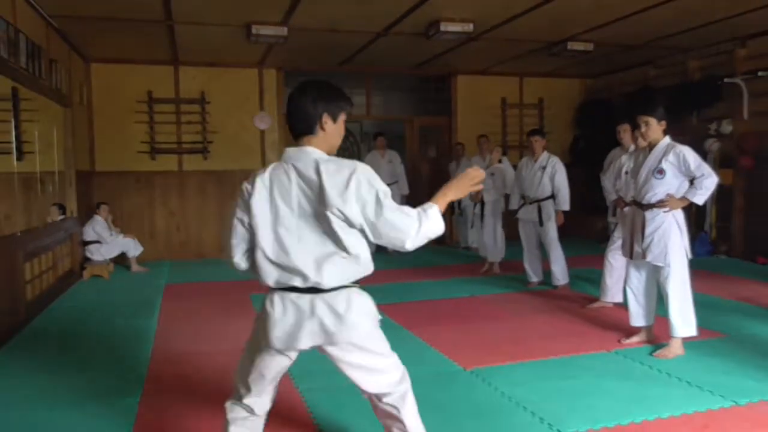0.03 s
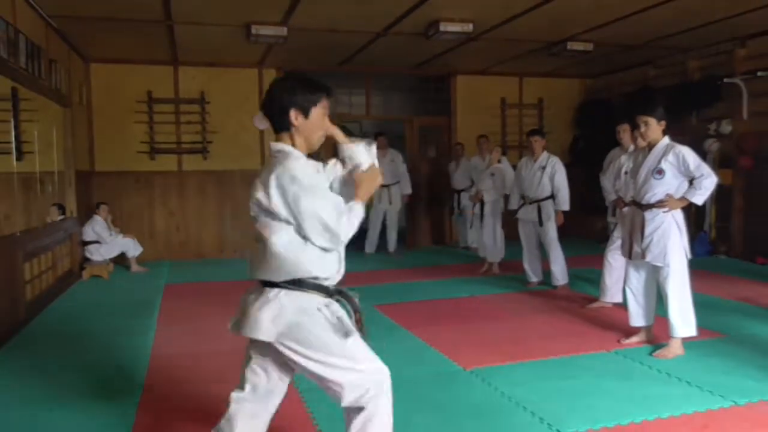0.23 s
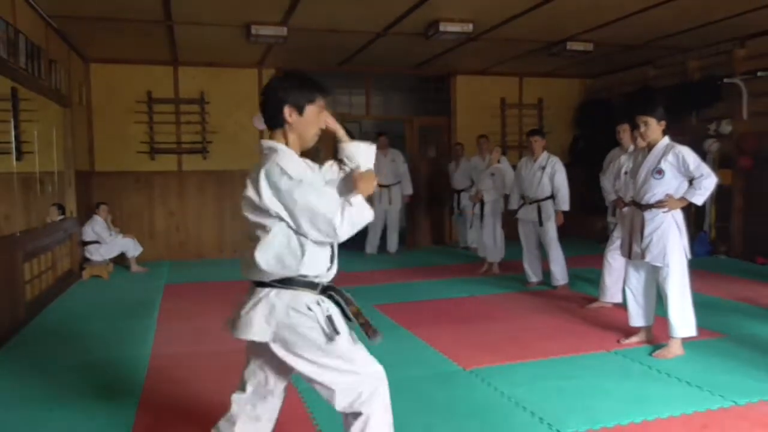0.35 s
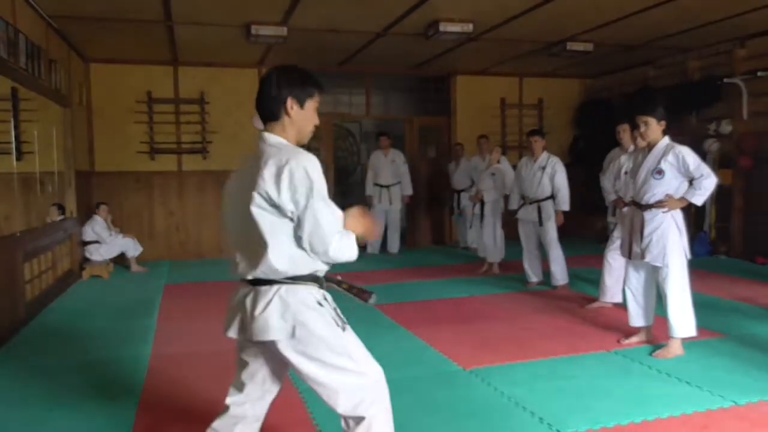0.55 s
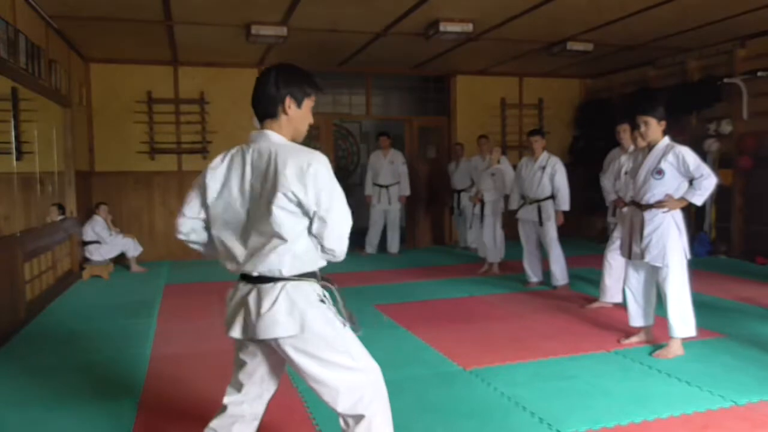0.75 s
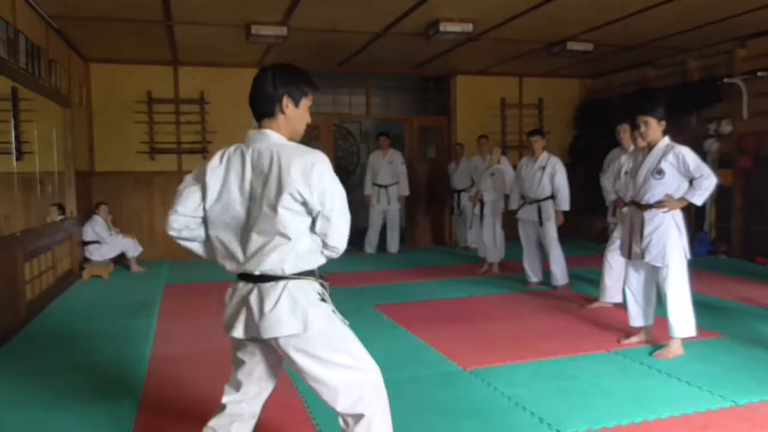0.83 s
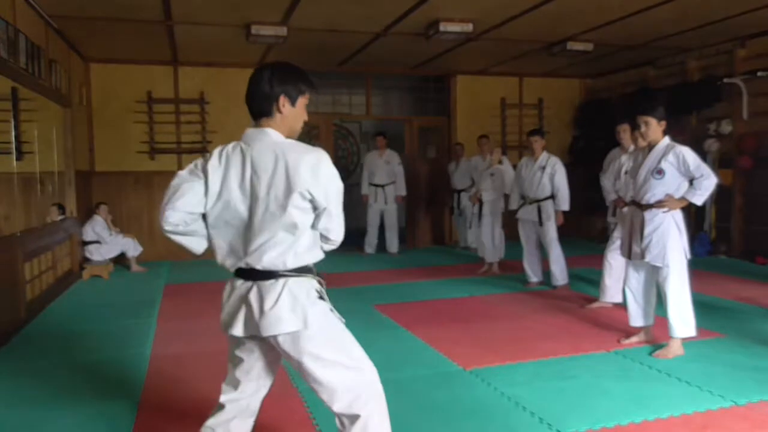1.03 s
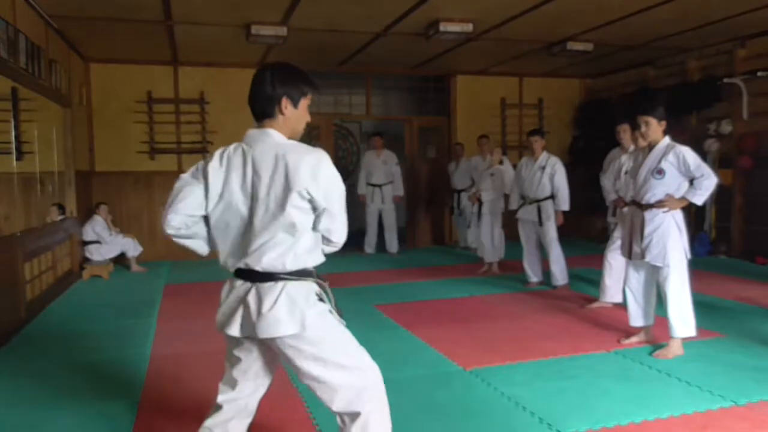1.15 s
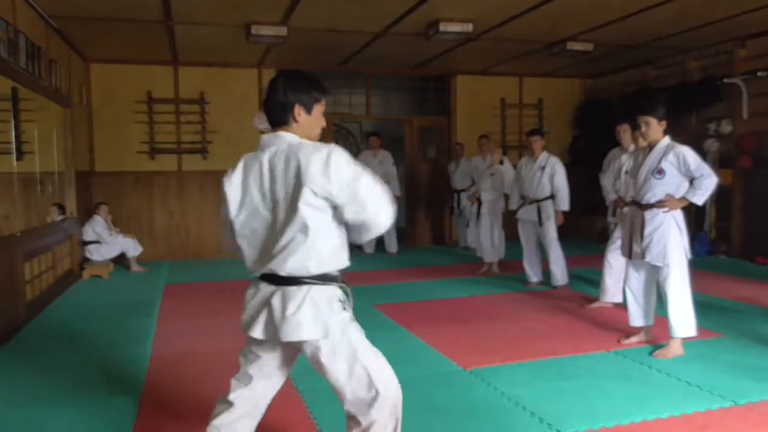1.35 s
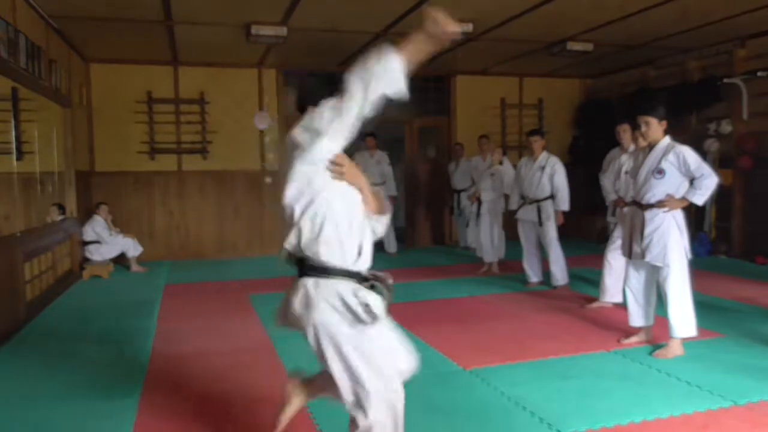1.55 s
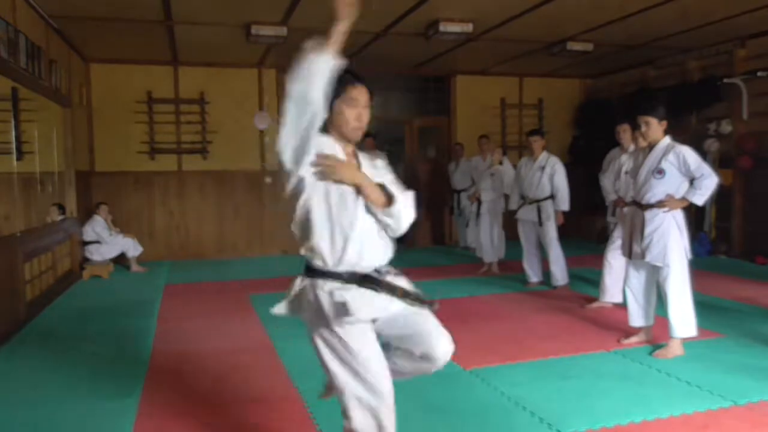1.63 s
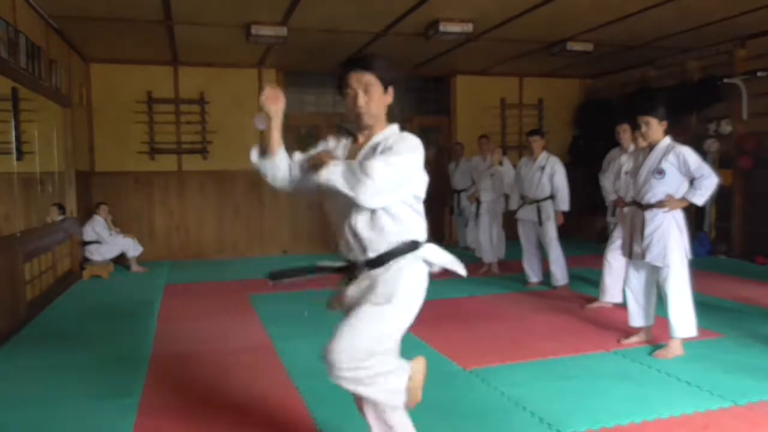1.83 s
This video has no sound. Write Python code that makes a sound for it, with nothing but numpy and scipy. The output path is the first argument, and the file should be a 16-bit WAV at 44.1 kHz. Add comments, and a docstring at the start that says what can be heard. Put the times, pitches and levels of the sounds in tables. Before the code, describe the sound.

A heavy cotton martial arts sleeve snaps taut like a whip crack, then a jacket flaps duller

```python
"""Punches in a heavy cotton suit

Punches are thrown in a reverberant hall. A sleeve jerks taut on the first: noise cracks and air pops.
Soft distant thumps follow, then the loose jacket flaps on the second: damped rings and filtered slaps.
Cloth rubs and billows as filtered random clicks; feet on mats, a deep rumble and the hall's low hum
are filtered noise. Cracks, thumps, flaps and cloth excite a synthetic decaying hall response."""
import sys
import numpy as np
from scipy import signal
from scipy.io import wavfile
from scipy.ndimage import uniform_filter1d

SR = 44100
rng = np.random.default_rng(int(sys.argv[2]) if len(sys.argv) > 2 else 0)


def to_wav(sig):
    """Store sig (one row per channel, or 1-D mono) as 16-bit WAV at the path in sys.argv[1].

    Samples outside -1..1 are clipped; the rate is SR.
    """
    pcm = np.clip(np.atleast_2d(sig), -1, 1) * 32767
    pcm = np.round(pcm).astype(np.int16)
    wavfile.write(sys.argv[1], SR, pcm.T)  # frames by channels


N = 83790
T = np.arange(N) / SR


def amp(db):
    """Logarithmic level: decibels become an amplitude factor."""
    return 10 ** (np.asarray(db) / 20)


def unit(x):
    """Normalization: the signal is scaled to an rms of one."""
    return x / np.sqrt(np.mean(x ** 2) + 1e-20)


def read(points, hz):
    """Logarithmic frequency axis: a table is interpolated along it."""
    f, value = np.transpose(points)
    return np.interp(np.log(hz + 1), np.log(f + 1), value)


def add(mix, s, sound):
    """Superposition: a sound is added to the mix at a time in seconds."""
    part = mix[round(s * SR):][:len(sound)]
    part += sound[:len(part)]


def colour(x, points, size=4096):
    """Minimum-phase filtering: a causal response of unit energy takes the shape of a spectrum."""
    hz = abs(np.fft.fftfreq(size, 1 / SR))
    log_gain = np.log(amp(read(points, hz)))
    # the Hilbert transform of the log gain supplies the minimum phase
    spectrum = np.exp(np.conj(signal.hilbert(log_gain)))
    taps = np.fft.ifft(spectrum).real[:size // 2]
    taps = taps / np.linalg.norm(taps)
    return np.apply_along_axis(lambda v: signal.fftconvolve(v, taps)[:N], -1, x)


def pair(a, b, same):
    """Interchannel correlation: two unrelated signals become left and right of a given likeness."""
    same = np.clip(same, -1, 1)
    mid = a * np.sqrt((1 + same) / 2)
    side = b * np.sqrt((1 - same) / 2)
    return np.array([mid + side, mid - side])


def grains(per_s, spread_db, same):
    """Shot noise: a stereo train of random clicks of uneven size and random sign."""
    size = amp(spread_db * np.minimum(rng.exponential(1, (2, N)), 5))
    sign = rng.choice([-1, 1], (2, N))
    present = rng.random((2, N)) < per_s / SR
    return unit(pair(*(size * sign * present), same))


def swells(rows):
    """Power summation: overlapping bell-shaped movements add in energy, not amplitude."""
    power = 0
    for s, rise, fall, db in rows:
        width = np.where(T < s, rise, fall)
        power = power + amp(db) ** 2 * np.exp(-((T - s) / width) ** 2 * 2)
    return np.sqrt(power)


# folds jerking taut: (time [s], crack level [dB], air pop level [dB], pop pitch [Hz])
FOLD_SNAPS = [(.2767, -6, 0, 1000), (.2782, -5, -2, 1200), (.2789, 15, 13, 1120), (.2801, .5, -1, 1250),
              (.2815, 5, 1.5, 1000), (.2842, 6.5, 4.5, 1100), (.2854, -4, 3.5, 520), (.2878, -4, -2, 1100),
              (.2901, 2, -8, 1100), (.2925, -3, -9, 1100)]
# spectrum of the fibre crack: (frequency [Hz], relative level [dB])
CRACK_SPECTRUM = [(1200, -22.5), (2100, -9), (2500, -12), (3000, -8), (3900, -10), (4650, -4.5),
                  (5400, -13.5), (6300, -13), (7300, -5.5), (9000, -3.5), (12000, 0.5), (14000, -10),
                  (16000, -19)]
# spectrum of the air pop: (multiple of its pitch [ratio], relative level [dB])
POP_SPECTRUM = [(.04, -50), (.09, -23), (.16, -6), (.27, -14), (.42, -7.5), (.55, -11), (.73, -.5),
                (1.05, -.5), (1.25, -1.5), (1.5, -18), (2, -18), (3, -22), (7.5, -52)]
CRACK_RISE_S, CRACK_FALL_S = .00019, .0002
FRAY_S, FRAY_DB = .0016, -21  # weaker, slower tail of the crack
CRACK_PAN_DB, POP_PAN_DB = -.6, .7  # left gain; the right is opposite
SNAP_WET_DB = -1


def sleeve():
    """Impulsive radiation: each taut fold gives a noise crack and an air pop, with its own hall tail."""
    out = np.zeros((2, N))
    t = T[:SR // 50] - T[SR // 500]  # begins 2 ms before the peak
    side = np.array([[1], [-1]])
    onset = np.exp(-abs(t) / CRACK_RISE_S)
    decay = np.exp(-abs(t) / CRACK_FALL_S) + amp(FRAY_DB) * np.exp(-abs(t) / FRAY_S)
    shape = np.where(t < 0, onset, decay)
    for s, crack_db, pop_db, pop_hz in FOLD_SNAPS:
        crack, pop = np.zeros(N), np.zeros(N)
        add(crack, s + t[0], shape * rng.choice([-1, 1], len(t)))
        crack = colour(crack, CRACK_SPECTRUM)
        crack = amp(crack_db) * crack / np.linalg.norm(crack)
        add(pop, s, amp([pop_db]))
        pop = colour(pop, [(k * pop_hz, db) for k, db in POP_SPECTRUM])
        direct = amp(side * CRACK_PAN_DB) * crack + amp(side * POP_PAN_DB) * pop
        out += direct + amp(SNAP_WET_DB) * hall((crack + pop)[None])
    return out


# soft distant thumps, perhaps steps across the hall, then jacket panels slapping the body on the punch:
# (time [s], ring level [dB], slap level [dB], ring pitch [Hz])
THUMPS_AND_FLAPS = [(1.046, -29, -35, 860), (1.058, -28, -34, 940), (1.073, -39, -55, 775),
                    (1.238, -26.5, -26, 343), (1.254, -27, -42, 1310), (1.5735, -1.5, -36, 638),
                    (1.578, -12, -12, 574), (1.5829, 1, 1.5, 578), (1.5877, -1, -6, 555),
                    (1.591, -10, -10, 1182), (1.5948, -16, -6, 970), (1.5976, -0.5, -3, 373),
                    (1.6028, -9, -9, 420), (1.6063, -14, -5, 1005), (1.6126, -7.5, -8, 788),
                    (1.645, -13, -21, 1066), (1.662, -14, -13, 774)]
# spectrum of the thump or slap: (frequency [Hz], relative level [dB])
SLAP_SPECTRUM = [(40, -35), (80, -7), (135, 11.5), (200, 0.5), (280, 2.5), (420, -3.5), (800, -5),
                 (1100, -2), (1350, -9), (1700, -22), (3000, -32), (6000, -58), (16000, -75)]
RING_S = 0.004  # time constant of the ring
FLAP_WET_DB = -3.5


def thumps_and_jacket():
    """Damped resonance: each thump or flap is a briefly decaying sine and a slap, direct and in the hall."""
    out = np.zeros((2, N))
    t = T[:SR // 20]
    slap = colour(signal.unit_impulse(len(t)), SLAP_SPECTRUM)[:len(t)]
    for s, ring_db, slap_db, hz in THUMPS_AND_FLAPS:
        soft_onset = 1 - np.exp(-(hz * t) ** 2 * 2)
        ring = np.sin(2 * np.pi * hz * t) * np.exp(-t / RING_S) * soft_onset
        ring = ring / np.linalg.norm(ring)
        hit = np.zeros(N)
        add(hit, s, amp(ring_db) * ring + amp(slap_db) * slap)
        out += hit + amp(FLAP_WET_DB) * hall(hit[None])
    return out


# cloth sliding on cloth: (peak time [s], rise [s], fall [s], hiss level [dB], scrape level [dB])
CLOTH_RUBS = [(0.067, 0.023, 0.036, -49.5, -54.5), (0.144, 0.04, 0.12, -47, -47),
              (0.238, 0.031, 0.17, -34, -47), (.445, 0.044, 0.025, -59, -41.5),
              (.62, 0.031, 0.039, -54.5, -59), (.77, 0.15, 0.057, -60, -61), (.95, 0.17, 0.2, -59.5, -61),
              (1.219, 0.045, 0.015, -56.5, -59.5), (1.278, 0.038, 0.029, -49.5, -55.5),
              (1.365, 0.066, 0.072, -46.5, -50.5), (1.5, 0.048, 0.078, -51.5, -51),
              (1.548, 0.018, 0.02, -42.5, -47), (1.584, 0.01, 0.029, -41, -39.5),
              (1.63, 0.047, 0.056, -51, -48.5), (1.797, 0.045, 0.048, -39.5, -46),
              (1.849, 0.039, 0.073, -38, -44.5)]
# spectrum of the fine hiss: (frequency [Hz], relative level [dB])
HISS_SPECTRUM = [(3000, -26.5), (6200, -13.5), (7300, -3), (8500, -5.5), (10000, -8.5), (12000, -9.5),
                 (14000, -15.5), (15500, -25), (16500, -45)]
# spectrum of the coarser scrape: (frequency [Hz], relative level [dB])
SCRAPE_SPECTRUM = [(200, -29), (500, -7.5), (900, -7.5), (1350, 3.5), (1700, 0.5), (2300, 0.5),
                   (3000, -1.5), (3800, 2.5), (4800, .5), (5800, -9.5), (9000, -38)]
FIBRES_PER_S, FIBRE_SPREAD_DB = 9000, 1


def rubbing():
    """Stick-slip friction: random fibre clicks form a fine hiss and a coarser scrape."""
    hiss_level = swells([(s, rise, fall, db) for s, rise, fall, db, _ in CLOTH_RUBS])
    scrape_level = swells([(s, rise, fall, db) for s, rise, fall, _, db in CLOTH_RUBS])
    hiss = grains(FIBRES_PER_S, FIBRE_SPREAD_DB, same=0.23) * hiss_level
    scrape = grains(FIBRES_PER_S, FIBRE_SPREAD_DB, same=0.53) * scrape_level
    return colour(hiss, HISS_SPECTRUM) + colour(scrape, SCRAPE_SPECTRUM)


# loose cloth pushing air: (peak time [s], rise [s], fall [s], level [dB])
CLOTH_BILLOWS = [(.148, 0.037, 0.045, -44.5), (.18, 0.014, 0.023, -37), (.245, 0.018, 0.027, -38),
                 (.68, 0.049, 0.025, -48), (.85, 0.22, 0.09, -60.5), (1.058, 0.018, 0.018, -47.5),
                 (1.29, 0.061, 0.1, -57), (1.465, 0.087, 0.016, -46), (1.497, 0.023, 0.043, -37),
                 (1.545, 0.021, 0.2, -43.5), (1.85, 0.006, 0.033, -51.5)]
# spectrum of the billowing: (frequency [Hz], relative level [dB])
BILLOW_SPECTRUM = [(50, -37), (150, -4.5), (260, -7.5), (380, 1), (560, -0.5), (800, -5.5), (1300, -13),
                   (1800, -25.5), (5000, -40.5)]
FOLDS_PER_S, FOLD_SPREAD_DB = 1500, 2


def billowing():
    """Air displacement: tumbling soft folds push air in sparse random clicks, filtered low."""
    folds = grains(FOLDS_PER_S, FOLD_SPREAD_DB, same=0.92)
    return colour(folds * swells(CLOTH_BILLOWS), BILLOW_SPECTRUM)


# weight shifting on the mats: (peak time [s], rise [s], fall [s], level [dB])
FOOT_STEPS = [(.005, .02, 0.059, -50), (.41, 0.15, 0.1, -46.5), (.575, 0.032, 0.12, -51.5),
              (1.645, 0.024, 0.16, -44.5), (1.78, 0.011, 0.081, -58)]
# spectrum of the mats: (frequency [Hz], relative level [dB])
MAT_SPECTRUM = [(30, -66), (80, -29), (100, -1.5), (140, 4), (185, -1), (260, -10), (800, -33.5)]


def feet():
    """Low-frequency impact response: shifting weight gives dull noise thuds, alike in both channels."""
    noise = pair(*rng.standard_normal((2, N)), same=1.0)
    return colour(noise * swells(FOOT_STEPS), MAT_SPECTRUM)


# a deep rumble coming and going: (peak time [s], rise [s], fall [s], level [dB])
RUMBLE_SWELLS = [(.01, 0.066, 0.029, -49), (.16, 0.069, 0.12, -59), (.52, 0.14, 0.17, -68),
                 (1.84, 0.013, 0.049, -69)]
# spectrum of the rumble: (frequency [Hz], relative level [dB])
RUMBLE_SPECTRUM = [(20, -18), (50, 7), (75, -1), (130, -7), (400, -29)]


def rumble():
    """Modulated low-frequency noise: a deep rumble swells, nearly the same in both channels."""
    noise = pair(*rng.standard_normal((2, N)), same=0.95)
    return colour(noise * swells(RUMBLE_SWELLS), RUMBLE_SPECTRUM)


# spectrum of the hall's background: (frequency [Hz], relative level [dB])
HUM_SPECTRUM = [(20, -11), (55, -3.5), (90, -8.5), (130, -2.5), (200, -3), (280, -7.5), (480, -3),
                (800, -5), (1000, -9.5), (1350, -8), (1800, -24), (5000, -31), (6200, -36), (8000, -48),
                (11000, -19.5), (13000, -28.5), (16000, -44)]
HUM_DB = -53.3


def hum():
    """Stationary noise: the hall's background keeps a constant level and spectrum."""
    noise = pair(*rng.standard_normal((2, N)), same=0.55)
    return amp(HUM_DB) * colour(noise, HUM_SPECTRUM)


# reverberation time, for a 60 dB decay: (frequency [Hz], time [s])
REVERB_TIME = [(100, 0.53), (400, 0.46), (1000, 0.6), (2500, 0.5), (5000, 0.57), (8000, 0.52),
               (14000, 0.34)]
# level of the reverberation: (frequency [Hz], level [dB])
REVERB_GAIN = [(100, -14), (200, -2), (450, -6.5), (850, 3.5), (1400, -2.5), (2200, 1), (3200, -5),
               (5000, -1), (8000, -8), (12000, -6.5), (14000, -13), (16000, -26)]
# likeness of left and right in the reverberation: (frequency [Hz], correlation [ratio])
REVERB_SAME = [(60, 0.96), (150, 0.82), (380, 0.79), (950, 0.57), (2400, 0.7), (6000, 0.22), (15000, 0.033)]
HALL_BUILD_S = 0.011


def hall(x):
    """Diffuse-field decay: a noise tail builds up briefly, then each band decays at its own rate."""
    hz, t, z = signal.stft(rng.standard_normal((2, SR)), SR, nperseg=512)
    t60 = read(REVERB_TIME, hz)[:, None]
    z = pair(*z, read(REVERB_SAME, hz)[:, None])
    z = z * amp(read(REVERB_GAIN, hz))[:, None]
    z = z * np.exp(-np.log(1000) * t / t60)
    z = z * np.sqrt(2 * np.log(1000) / (t60 * SR))  # energy independent of decay time
    tail = signal.istft(z, SR, nperseg=512)[1][:, :SR]
    tail = tail * np.minimum(T[:SR] / HALL_BUILD_S, 1)
    return signal.fftconvolve(x, tail, axes=1)[:, :N]


CLOTH_WET_DB = -2


def scene():
    """Superposition: direct sources, reverberation and background add linearly."""
    cloth = rubbing() + billowing()
    cloth_in_hall = amp(CLOTH_WET_DB) * hall(cloth)
    return sleeve() + thumps_and_jacket() + cloth + cloth_in_hall + feet() + rumble() + hum()


LIMIT_DB, RECOVER_DB_PER_S = -9.5, 30  # level above which gain is reduced, and its recovery
CEILING, EDGE_HZ = .92, 16500  # peak amplitude before the low-pass, and the low-pass edge


def record(dry):
    """Dynamic compression: loud peaks duck the gain, then are rounded and low-passed."""
    power = uniform_filter1d((dry ** 2).mean(0), size=88)  # 2 ms window
    power_db = 10 * np.log10(abs(power) + 1e-12)
    fall = T * RECOVER_DB_PER_S
    held_db = np.maximum.accumulate(power_db + fall) - fall  # peak hold with linear decay
    over_db = np.maximum(held_db - LIMIT_DB, 0)
    ducked = dry / amp(uniform_filter1d(over_db, size=22))
    rounded = ducked / (1 + (ducked / CEILING) ** 6) ** (1 / 6)
    taps = signal.firwin(255, EDGE_HZ, window=("kaiser", 9), fs=SR)
    return signal.oaconvolve(rounded, taps[None], "same")


dry = scene()
out = record(dry)
to_wav(out)
```